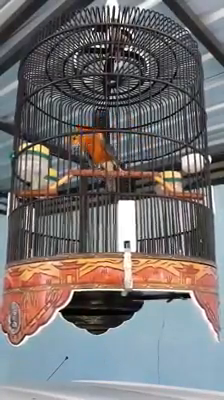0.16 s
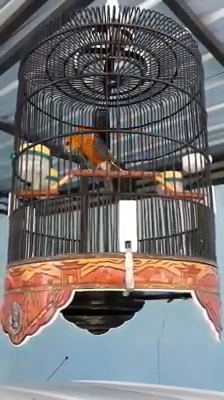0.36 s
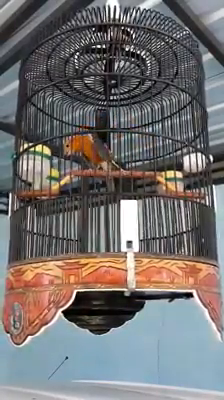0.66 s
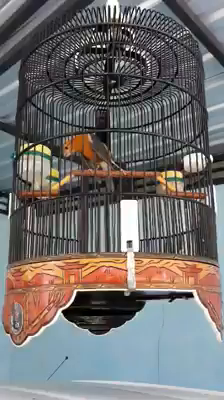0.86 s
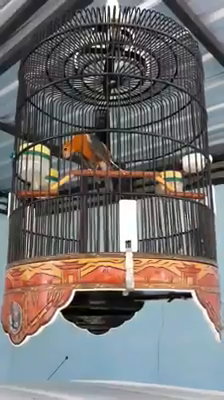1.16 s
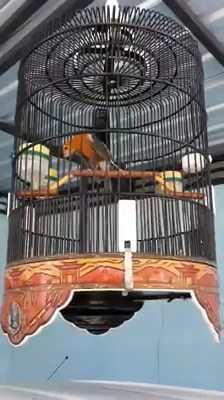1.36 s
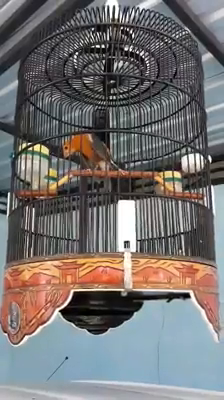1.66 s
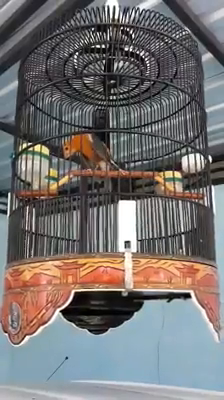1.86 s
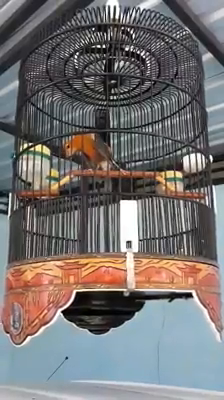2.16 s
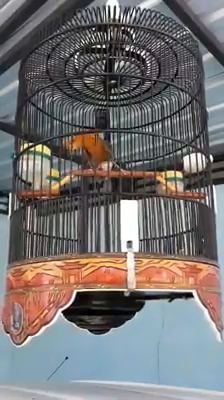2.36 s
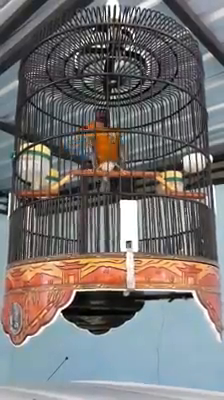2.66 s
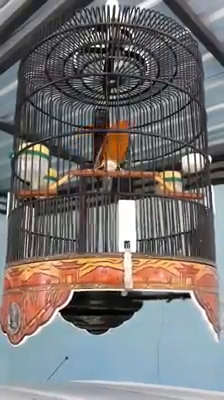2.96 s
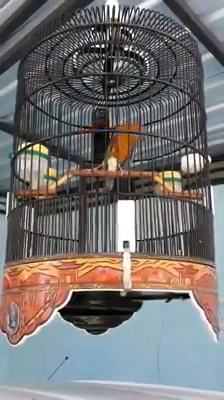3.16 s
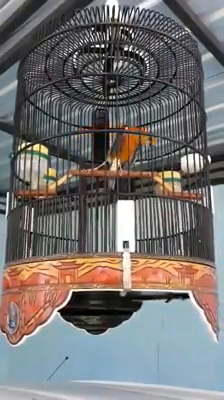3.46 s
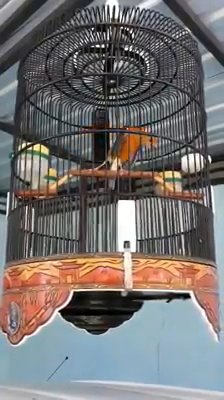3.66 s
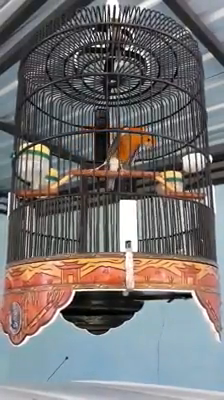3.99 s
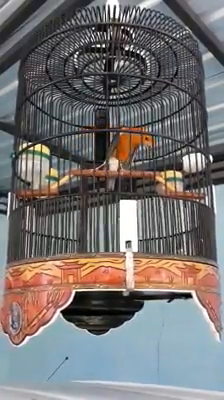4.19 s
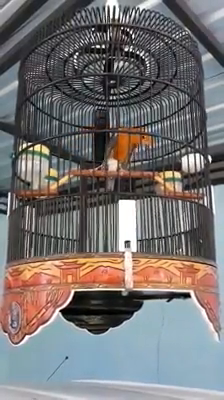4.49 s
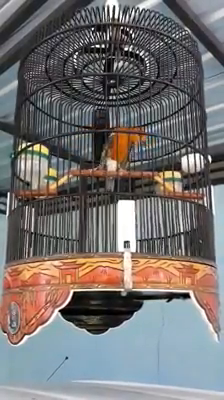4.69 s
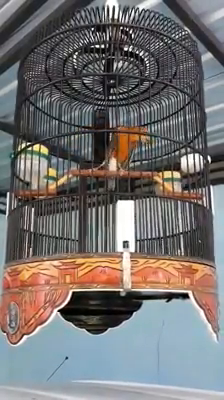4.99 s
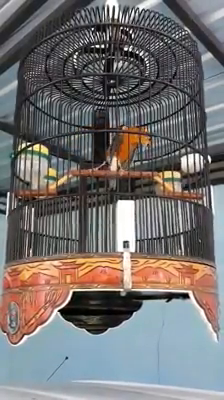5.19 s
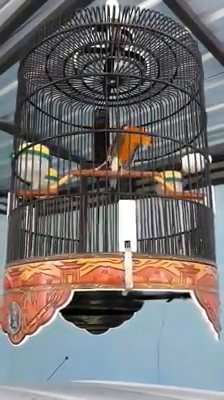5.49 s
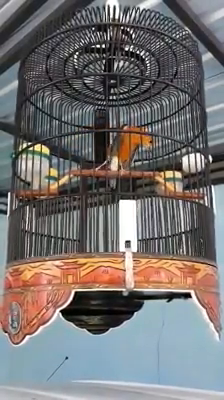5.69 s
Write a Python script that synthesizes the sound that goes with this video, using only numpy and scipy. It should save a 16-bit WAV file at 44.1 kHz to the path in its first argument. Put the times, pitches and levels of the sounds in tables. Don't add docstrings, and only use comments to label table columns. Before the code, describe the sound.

Close, loud bird song with short hard echoes from cage, roof and walls. Shrill buzzing bursts give way to a snapped rising note and raspy calls, then a wheeze, an even trill, a liquid warble and overlapping clear whistles ending in two quick flicks. Faint town hum, a thin insect hiss and feather rustles lie underneath; the loudest treble sounds slightly blurred and overloaded.

```python
import sys
import numpy as np
from scipy import signal
from scipy.fft import rfft, irfft, next_fast_len
from scipy.io import wavfile
from scipy.ndimage import uniform_filter1d, minimum_filter1d

SR = 44100
rng = np.random.default_rng(int(sys.argv[2]) if len(sys.argv) > 2 else 0)


def invert_db(level):
    return 10 ** (np.asarray(level, dtype=float) / 20)


def wav_out(sig):
    wavfile.write(sys.argv[1], SR, np.round(np.clip(np.atleast_2d(sig).T, -1, 1) * 32767).astype(np.int16))


N = 257544
LEAD = SR // 4

# f/Hz, density/dB
TOWN_SPECTRUM = [(18, -57), (30, -36), (103, -0.5), (319, -9), (461, -8.5), (866, -18), (1430, -22),
                 (2290, -23.5), (3970, -24.5), (6890, -27.5), (7860, -37), (10500, -42.5), (16000, -36.5)]
# middle t/s, half width/s, rise/dB
TRAFFIC_SWELLS = [
    (0, .2, 4),
    (3.55, .55, 7),
    (4.58, .33, 7.5),
]
RUMBLE_DB, HISS_DB, HISS_FOLLOW = -51.5, -55.5, 1.1
# start t/s, length/s, level/dB
FEATHER_RUSTLES = [
    (0.486, 0.13, -47.5),
    (0.793, .05, -47),
    (1.156, 0.11, -47.5),
    (1.475, 0.075, -47),
    (3.884, 0.078, -43.5),
    (4.09, 0.12, -68.5),
    (4.538, 0.12, -41),
]
# f/Hz, half width/Hz, level/dB
INSECT_BAND = (9400, 630, -30)
# start t/s, end t/s
INSECT_CALLS = [
    (1.46, 1.89),
    (5.325, 5.45),
]
# t/s, f/Hz, level/dB
DISTANT_BIRD = [(.43, 4650, -66), (.45, 4620, -58), (.49, 4600, -61), (.52, 4600, -70)]
# delay/s, level/dB
NEAR_ECHOES = [(.0031, -11), (.0068, -14.5), (.0115, -15), (.018, -13.5), (.025, -15)]
# f/Hz, T60/s, level/dB
TAIL_BANDS = [(1000, .42, -12), (3500, 0.39, -11), (6510, 0.25, -12.5), (11760, 0.4, -13)]

# roughness/share, breath/dB, overtones 2, 3, ../dB
BUZZY = (0.17, -34, -21)
TRILLED = (0.2, -34.5, -12, -27, -16.5)
WIDE = (0.44, -15, 8.5, 12, 20.5, 9, 2.5, -5.5, 1.5, -0.5)
NARROW = (0.52, -2, -8, 7, -6, -7, -12.5, -15, -12.5)
PURE = (0.16, -52.5, -29.5, -41)
CLEAR = (0.0842, -39.5, -16.5, -32.5, -28.5)
SHARP = (0.63, -14, -7, -21, -14.5, -22)
HARSH = (0.72, -2.5, -22.5, -18.5)
REEDY = (0.3, -15, 1.5, 4.5, -1.5, -18, -21, -16)
WARBLED = (0.08, -48, -31.5, -48, -27, -33.5)
THIN = (0.05, -47, -37, -36.5, -28.5, -30)
SLIDING = (0.36, -25, -29.5, -29)
OPENING = (0.34, -18, -33, -33)
FIRST = (0.17, -16, -4, -39, -28.5)
RASPY = (0.45, 3, 2, -5, -11, -10, -3, -3.5)
FALLING = (1.14, -2.5, 3.5, -7, -9, -12.5, -13)
MIXED = (0.56, -20.5)
RINGING = (0.45, -16)
# attack/s, scoop/ratio, start/dB, swell/dB, bend/share (above 1 arches), release/s, end pitch/ratio,
# end/dB
CLIMB = (.011, 1, -24, -7, .58, .011, .98, -22)
HOOK = (.009, .6, -11, 1, .2, .01, .985, -10)
LEAN = (.013, .9, -12, -3, .8, .008, 1, -3)
FLICK = (.008, .63, -3, -9, .5, .003, .95, -14)
DIVE = (.0035, 1.28, -3, -2, .54, .004, .89, -16)
FADE = (.016, 1.005, -8, 6, .4, .035, .99, -19)
ARCHED = (.007, .89, -21, -4, 1.8, .017, .89, -21)
SNARL = (.024, .95, -26, 6, .4, .012, 1.01, -8)
OVERTONE_WAVER = 0.016
SLACK_DB_PER_DB = 0.3
ONSET_DB, ONSET_S = -6.5, .0015

# first slide t/s, spacing/s, first f/Hz, level/dB
BUZZES = [
    (-.12, .014, 7080, -8),
    (.198, .0133, 7100, -10.5),
    (.6005, .0136, 6900, -11.5),
    (.852, .0141, 6920, -10.5),
]
# t from middle/s, pitch/ratio, level/dB
BUZZ_SLIDE = [(-.0068, 1.045, -25), (-.0045, 1.07, -5), (0, 1.008, 4), (.003, .952, 3), (.005, .935, -25)]
BUZZ_CLIMB_HZ, BUZZ_IN_DB, BUZZ_OUT_DB = 62, -9.5, -8
# start t/s, level/dB
TRILL_NOTES = [(3.222, -12.5), (3.272, -13.5), (3.325, -14), (3.377, -14.5), (3.4213, -12.5),
               (3.475, -14.5), (3.527, -16.5), (3.582, -15)]
# t/share of length, pitch/ratio, level/dB
TRILL_ARCH = [(0, .82, -13), (.08, .94, -7), (.25, .99, -3), (.6, 1, 0), (.88, .98, -2), (1, .9, -16)]
TRILL_HZ, TRILL_LIFT_HZ = 3550, 400
TRILL_NOTE_S, TRILL_EXTRA_S, TRILL_SETTLE_S = .03, .01, .08
TRILL_DULLING_DB = -6
# start t/s, pitch/ratio, level/dB, stretch/ratio
CHURRS = [
    (1.883, 1.005, -17.5, 0.99),
    (2.158, 1.001, -18, 1),
    (2.443, .985, -18.5, 1),
]
# t from start/s, f/Hz, level/dB
CHURR_WIDE = [(0, 1465, -32.5), (.006, 1547, -13.5), (.02, 1634, -3.5), (0.035, 1700, 2),
              (.037, 1690, -38.5)]
# t from start/s, f/Hz, level/dB
CHURR_NARROW = [(.03, 1740, -22), (0.039, 1800, 2.5), (0.049, 1910, -3.5), (.058, 1995, -7),
                (0.063, 2000, -22)]
# t/s, middle f/Hz, swing/Hz, level/dB
WARBLE_OUTLINE = [(4.746, 2910, 320, -8), (4.772, 3010, 520, -6.5), (4.8, 3000, 620, -5.5),
                  (4.851, 2870, 780, -7.5), (4.878, 2720, 800, -7), (4.93, 2375, 380, -9),
                  (4.956, 2340, 250, -12)]
# t/s, f/Hz, level/dB
WARBLE_START = [(4.667, 2700, -32), (4.676, 3140, -17), (4.69, 3085, -1), (4.716, 2900, -8),
                (4.728, 3030, -2), (4.739, 2740, -6)]
WAVE_FIRST_S, WAVE_S, WAVE_FALL = 4.746, .0263, .68
# (start t/s, length/s, from f/Hz, to f/Hz, level/dB)
GLIDES = [
    (RINGING, FADE, (1.614, .1, 5090, 5080, -30)),
    (FALLING, DIVE, (1.6115, .0155, 3544, 2020, -20.5)),
    (RASPY, FADE, (1.612, .09, 1660, 1520, -43.5)),
    (OPENING, ARCHED, (2.748, .044, 1720, 1800, -21.5)),
    (HARSH, SNARL, (2.806, .106, 4460, 5450, -23)),
    (FIRST, HOOK, (3.112, .088, 3250, 3060, -21)),
    (TRILLED, LEAN, (3.155, .058, 3620, 3927, -14.5)),
    (THIN, FLICK, (5.795, .029, 3640, 2200, -15)),
    (THIN, FLICK, (5.823, .027, 3350, 2200, -13)),
]
# t/s, f/Hz, level/dB
CHACK = [(1.582, 2410, -47), (1.588, 3325, -29), (1.596, 4130, -21), (1.603, 5028, -6.5), (1.609, 4962, -6),
         (1.613, 4800, -19)]
# t/s, f/Hz, level/dB
WHEEZE = [(2.752, 3095, -50), (2.762, 3265, -34), (2.782, 2890, -28), (2.805, 2440, -16), (2.83, 2145, -22),
          (2.86, 2023, -18), (2.89, 1975, -21), (2.911, 1640, -26)]
REED_FADE_S, REED_DB = .015, -8.5
# t/s, f/Hz, level/dB
LONG_WHISTLE = [(5.58, 2080, -41), (5.594, 2430, -21), (5.63, 2517, -15.5), (5.7, 2603, -15.5),
                (5.74, 2712, -10.5), (5.765, 2940, -16), (5.775, 3700, -24), (5.792, 2376, -11),
                (5.796, 2200, -28)]
# start t/s, length/s, from f/Hz, to f/Hz, level/dB
UPPER_VOICE = [
    (5.049, .093, 3960, 4740, -4.5),
    (5.334, .093, 4310, 4900, -7.5),
]
# start t/s, held/s, f/Hz, drop/Hz, level/dB
LOWER_VOICE = [
    (5.098, .128, 3640, 315, -8.5),
    (5.384, .084, 3660, 1250, -11.5),
]
LOWER_SCOOP, LOWER_ATTACK_S, LOWER_SWELL_S = .8, .008, .04
LOWER_SAG_HZ_PER_S, LOWER_DROP_HZ_PER_S = 1450, 39000
BEAT_LOW_DB, BEAT_HIGH_DB, BEAT_S = -34, -30, .08

# f/Hz, gain/dB
TOP_COLOUR = [(8000, -22.5), (9000, -14.5), (10500, -10.5), (12500, -5.5), (14500, -3.5), (15600, 1),
              (16100, -55)]
# f/Hz, level/dB
SELF_NOISE = [(8000, -110), (10500, -89), (13000, -71), (15500, -70.5), (16100, -110)]
# f/Hz, level/dB
OVERLOAD_HISS = [(8600, -88), (9800, -40), (12000, -31), (14500, -48), (15800, -52.5), (16200, -94)]
SPLIT_HZ, BLUR_SHARE, DRIVE, THUMP_DB = 8253, .5, 0.35, -29.5


def colour(x, points):
    size = next_fast_len(len(x))
    hz, db = np.transpose(points)
    bins_hz = np.arange(1, size // 2 + 2) * SR / size
    gain = invert_db(np.interp(np.log(bins_hz), np.log(hz), db))
    return irfft(rfft(x, size) * gain, size)[:len(x)]


def noise(size=N):
    return rng.standard_normal(size)


def unit(x):
    return x / np.sqrt(np.mean(x ** 2))


def flutter(size, rate_hz):
    k = int(SR / rate_hz)
    return unit(uniform_filter1d(uniform_filter1d(noise(size), k), k))


def town():
    t = np.arange(N) / SR
    swell_db = sum(db * np.exp(-((t - s) / width) ** 2) for s, width, db in TRAFFIC_SWELLS)
    hum = colour(noise(), TOWN_SPECTRUM)
    rumble = colour(hum, [(800, 0), (1200, -38)])
    rumble_db = RUMBLE_DB + swell_db + 0.4 * flutter(N, 4.3)
    hiss_db = HISS_DB + HISS_FOLLOW * swell_db + 1.8 * flutter(N, 5.2)
    return unit(rumble) * invert_db(rumble_db) + unit(hum - rumble) * invert_db(hiss_db)


def insect():
    t = np.arange(N) / SR
    hz, width, db = INSECT_BAND
    band = unit(colour(noise(), [(hz - 2.7 * width, -50), (hz - width, 0),
                                 (hz + width, 0), (hz + 0.98 * width, -50)]))
    gate = sum(np.clip(np.minimum(t - start, end - t) / 0.025, 0, 1) for start, end in INSECT_CALLS)
    return band * invert_db(db + 1.49 * flutter(N, 35)) * gate


def rustles():
    t = np.arange(N) / SR
    swish = unit(colour(noise(), [(300, -3.5), (1500, -3), (6000, -6.5), (8000, -10),
                                  (9000, -13.5), (14000, -15.5), (16000, -28.5)]))
    level = np.zeros(N)
    for start, length, db in FEATHER_RUSTLES:
        rise, fade = (t - start) / 0.0071, 3 * (start + length - t) / length
        level += invert_db(db) * np.clip(np.minimum(rise, fade), 0, 1)
    return swish * level


def porch(x):
    t = np.arange(SR // 2) / SR
    response = (t == 0) * 1.
    for k, (delay, db) in enumerate(NEAR_ECHOES):
        response[int(delay * SR)] += (-1) ** k * invert_db(db)
    for hz, t60, db in TAIL_BANDS:
        band = colour(noise(len(t)), [(hz / 2, -40), (hz / 1.93, -3), (hz, 0),
                                      (hz * 1.67, -3), (hz * 2, -40)])
        tail = invert_db(-60 * t / t60) * np.clip(t / 0.024, 0, 1)
        response += invert_db(db) * band * tail / np.sqrt(np.sum(tail ** 2))
    return signal.fftconvolve(x, response)[LEAD:LEAD + N]


def syrinx(song, timbre, points):
    rough, breath_db, *overtones_db = timbre
    s, hz, db = np.transpose(points)
    at = np.arange(int(s[0] * SR), min(int(s[-1] * SR), N))
    hz, db = (uniform_filter1d(np.interp(at / SR, s, c), SR // 600, mode="nearest") for c in (hz, db))
    hz = hz * (1 + .03 * rough * flutter(len(at), 600))
    phase = 2 * np.pi * np.cumsum(hz) / SR
    waver = OVERTONE_WAVER * max(-min(overtones_db[:1], default=0), 0)
    rich = invert_db(np.minimum(SLACK_DB_PER_DB * (db.max() - db), 12)) * (1 + waver * flutter(len(at), 500))
    tone = np.sin(phase) * (hz < .45 * SR)
    for k, overtone_db in enumerate(overtones_db, 2):
        tone += invert_db(overtone_db) * rich * np.sin(k * phase) * (k * hz < .45 * SR)
    breath = colour(noise(len(at)), [(900, -34.5), (2000, -5), (5500, 9), (16000, -9)])
    voice = np.sqrt(2) * tone * (1 + rough * flutter(len(at), 700)) + invert_db(breath_db) * breath
    song[at + LEAD] += voice * invert_db(db) * signal.windows.tukey(len(at), min(90 / len(at), 1))
    song[at + LEAD] += invert_db(db[0] + ONSET_DB) * breath * np.exp(-(at - at[0]) / SR / ONSET_S)


def glide(manner, start, length, from_hz, to_hz, db):
    attack, scoop, start_db, swell_db, bend, release, droop, end_db = manner
    a, b = start + attack, start + length - release
    middle_hz = from_hz + bend * (to_hz - from_hz) + max(bend - 1, 0) * .27 * from_hz
    return [(start, from_hz * scoop, db + swell_db + start_db),
            (a, from_hz, db + swell_db),
            ((a + b) / 2, middle_hz, db),
            (b, to_hz, db),
            (b + release, to_hz * droop, db + end_db)]


def buzzes(song):
    for first, spacing, hz, db in BUZZES:
        for k, soft_db in enumerate([BUZZ_IN_DB, 0, 0, 0, 0, BUZZ_OUT_DB]):
            middle, slide_hz = first + k * spacing, hz + k * BUZZ_CLIMB_HZ
            syrinx(song, BUZZY, [(middle + t, slide_hz * r, db + soft_db + d) for t, r, d in BUZZ_SLIDE])


def churrs(song):
    for s, ratio, db, stretch in CHURRS:
        for timbre, path, trim_db in ((WIDE, CHURR_WIDE, -20), (NARROW, CHURR_NARROW, -12)):
            syrinx(song, timbre, [(s + t * stretch, hz * ratio, db + d + trim_db) for t, hz, d in path])


def wheeze(song):
    syrinx(song, SLIDING, WHEEZE[:5])
    fade_in = [(WHEEZE[4][0] - REED_FADE_S, 2300, -60)]
    syrinx(song, REEDY, fade_in + [(s, hz, db + REED_DB) for s, hz, db in WHEEZE[4:]])


def trill(song):
    for s, db in TRILL_NOTES:
        fresh = np.exp(-(s - TRILL_NOTES[0][0]) / TRILL_SETTLE_S)
        length = TRILL_NOTE_S + TRILL_EXTRA_S * fresh ** .4
        hz = TRILL_HZ + TRILL_LIFT_HZ * fresh
        bright_db = 3.5 + TRILL_DULLING_DB * (1 - fresh ** .4)
        timbre = (*TRILLED[:2], *(g + bright_db for g in TRILLED[2:]))
        syrinx(song, timbre, [(s + t * length, hz * r, db + d) for t, r, d in TRILL_ARCH])


def warble(song):
    s, *columns = np.transpose(WARBLE_OUTLINE)
    rows = []
    for crest in WAVE_FIRST_S + WAVE_S * np.arange(9):
        hz, swing, db = (np.interp(crest, s, c) for c in columns)
        rows += [(crest, hz + swing / 2, db - 1.1),
                 (crest + .55 * WAVE_FALL * WAVE_S, hz, db + 1.5),
                 (crest + WAVE_FALL * WAVE_S, hz - swing / 2, db - 1.5),
                 (crest + (1 + WAVE_FALL) / 2 * WAVE_S, hz, db - 2.5)]
    ending = [(rows[-4][0] + .012, hz - swing / 2, -50)]
    syrinx(song, WARBLED, WARBLE_START + rows[:-3] + ending)


def duet(song):
    for upper, (s, held, hz, drop_hz, db) in zip(UPPER_VOICE, LOWER_VOICE):
        end, fall = s + held, drop_hz / LOWER_DROP_HZ_PER_S
        last_hz, top_hz = hz - LOWER_SAG_HZ_PER_S * held, upper[3]
        syrinx(song, PURE, glide(CLIMB, *upper))
        syrinx(song, CLEAR, [(s, hz * LOWER_SCOOP, db - 34),
                             (s + LOWER_ATTACK_S, hz, db - 10),
                             (s + LOWER_SWELL_S, hz, db),
                             (end, last_hz, db - 1.4),
                             (end + fall / 2, last_hz - .28 * drop_hz, db - 3),
                             (end + fall, last_hz - drop_hz, db - 28)])
        for beat_hz, sag, beat_db in ((2 * hz - top_hz, .95, db + BEAT_LOW_DB),
                                      (2 * top_hz - hz, 1.01, db + BEAT_HIGH_DB)):
            syrinx(song, MIXED, [(s, beat_hz, beat_db - 4), (s + .02, beat_hz, beat_db),
                                 (s + BEAT_S, beat_hz * sag, beat_db - 9)])


def thrush():
    song = np.zeros(N + LEAD)
    syrinx(song, MIXED, DISTANT_BIRD)
    for phrase in (buzzes, churrs, wheeze, trill, warble, duet):
        phrase(song)
    for timbre, manner, row in GLIDES:
        syrinx(song, timbre, glide(manner, *row))
    syrinx(song, SHARP, CHACK)
    syrinx(song, THIN, LONG_WHISTLE)
    return song


def scene():
    return (town() + insect() + rustles() + porch(thrush()))[None]


def blur(x):
    cells = signal.stft(x, nperseg=256)[2]
    chance = noise(cells.shape) + 1j * noise(cells.shape)
    return signal.istft(cells * (1 - BLUR_SHARE + BLUR_SHARE * chance), nperseg=256)[1][:N]


def thump(bent):
    shrill = colour(bent, [(5500, -40), (6500, 1)])
    return invert_db(THUMP_DB) * colour(shrill ** 2, [(30, -29), (70, -1), (300, 3), (700, -31)])


def limit(x):
    need = np.minimum(1, .99 / (np.abs(x) + 1e-9))
    return x * uniform_filter1d(minimum_filter1d(need, SR // 300), SR // 300)


def roll_off(x):
    return signal.sosfilt(signal.butter(12, 16130, fs=SR, output="sos"), x)


def record(dry):
    bent = np.tanh(DRIVE * dry[0]) / DRIVE
    low = colour(bent, [(SPLIT_HZ - 250, 0), (SPLIT_HZ + 150, -60)])
    sound = low + colour(blur(bent - low), TOP_COLOUR)
    sound += colour(noise(), SELF_NOISE)
    sound += colour(uniform_filter1d(bent ** 2, SR // 200) * noise(), OVERLOAD_HISS)
    sound += thump(bent)
    mix = limit(sound)[None]
    return roll_off(mix)


dry = scene()
out = record(dry)
wav_out(out)
```